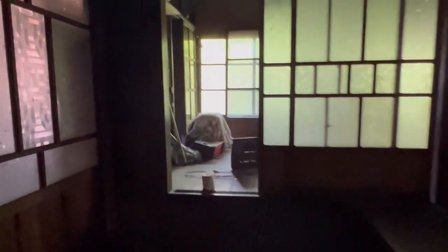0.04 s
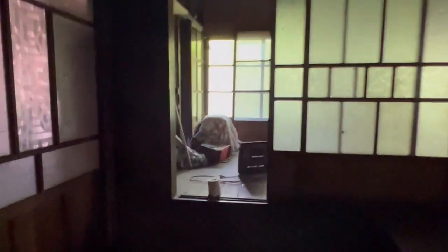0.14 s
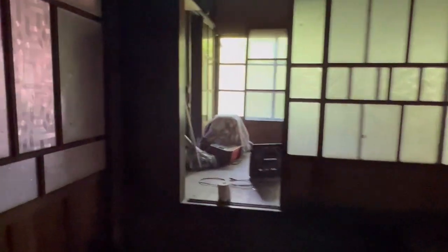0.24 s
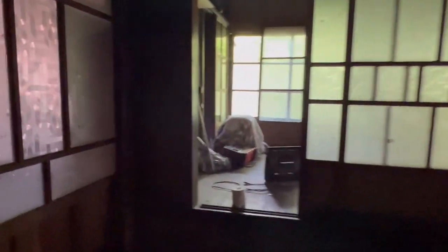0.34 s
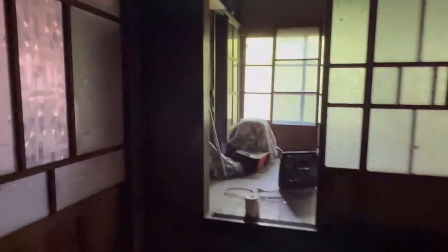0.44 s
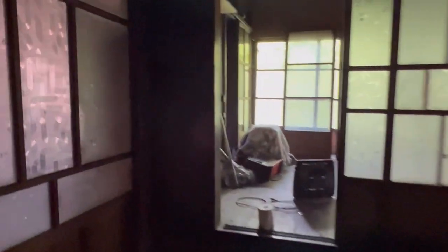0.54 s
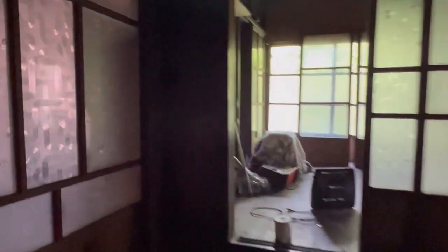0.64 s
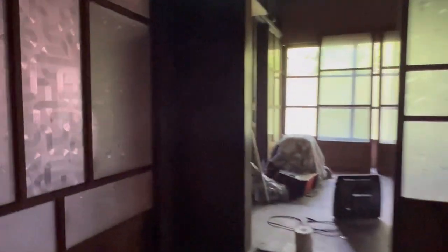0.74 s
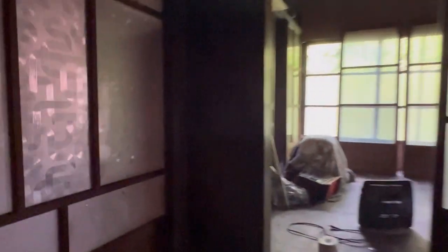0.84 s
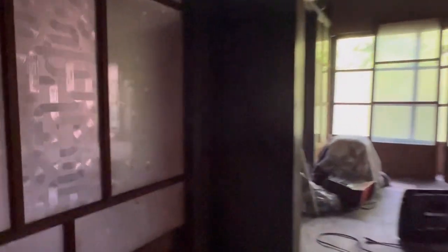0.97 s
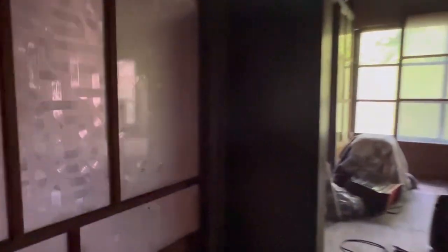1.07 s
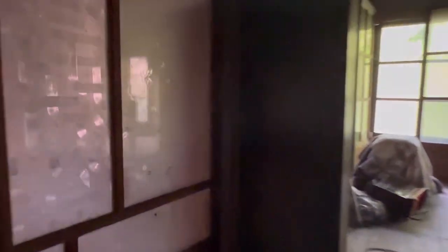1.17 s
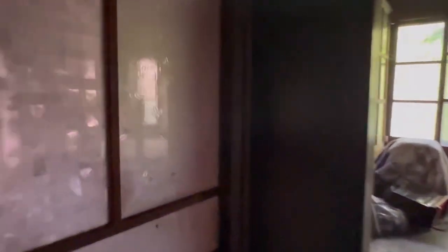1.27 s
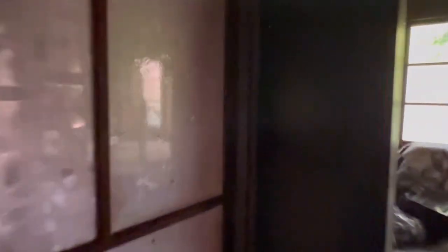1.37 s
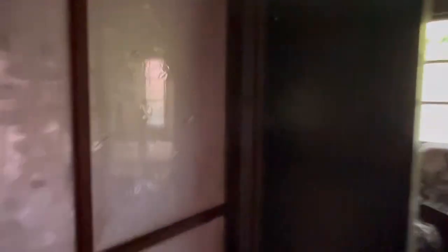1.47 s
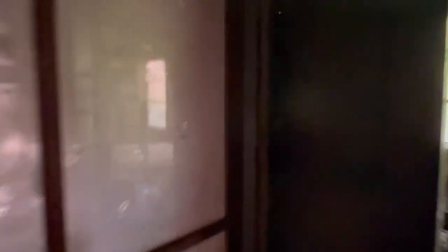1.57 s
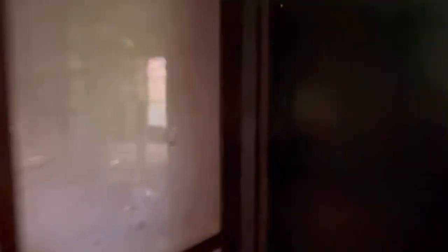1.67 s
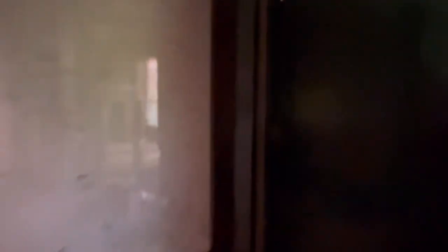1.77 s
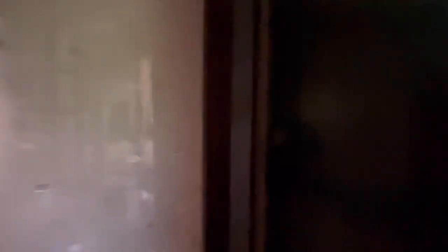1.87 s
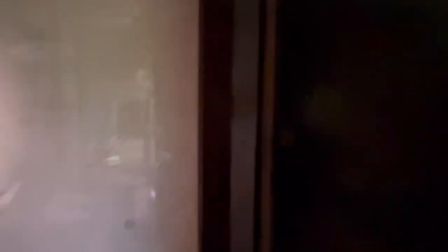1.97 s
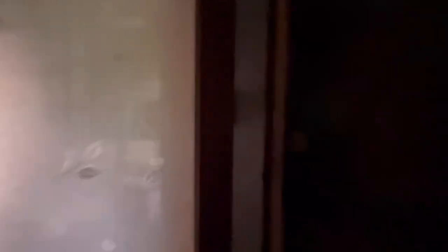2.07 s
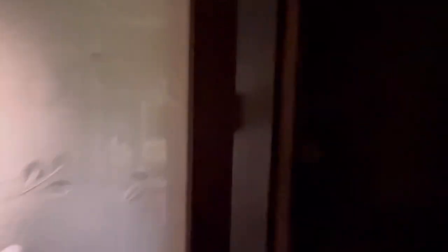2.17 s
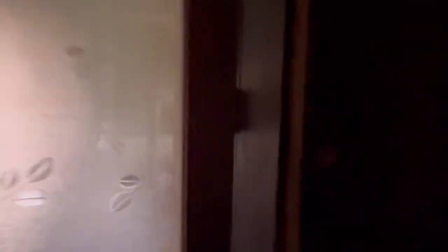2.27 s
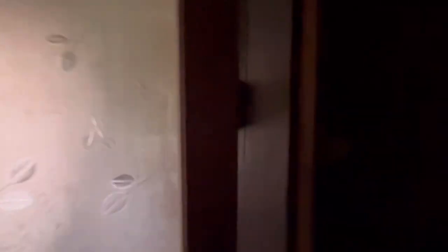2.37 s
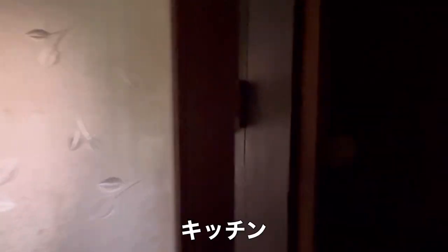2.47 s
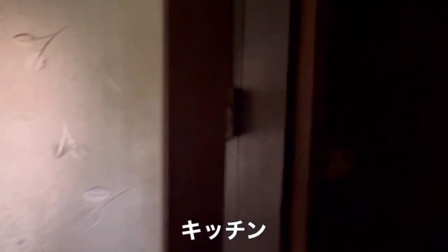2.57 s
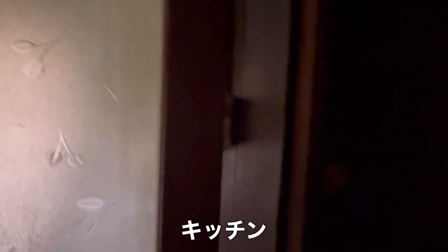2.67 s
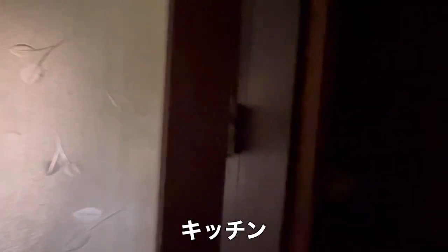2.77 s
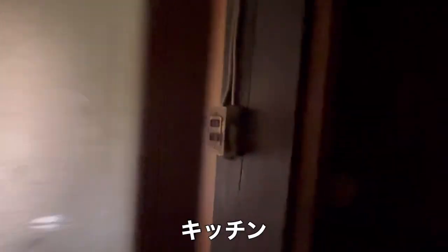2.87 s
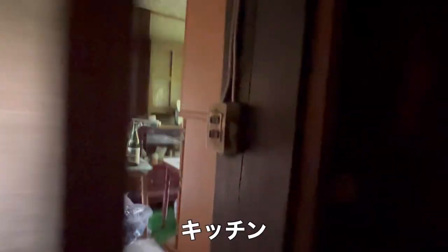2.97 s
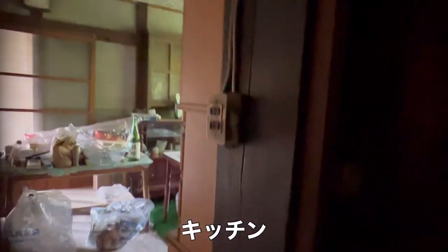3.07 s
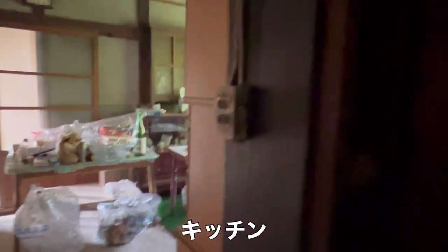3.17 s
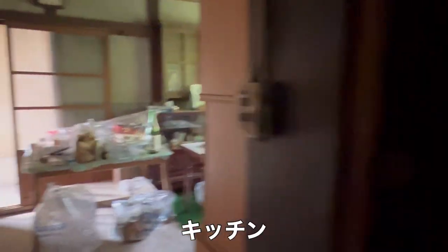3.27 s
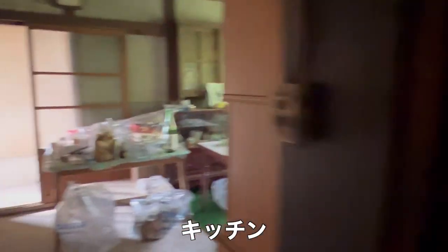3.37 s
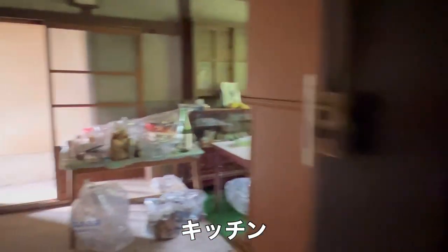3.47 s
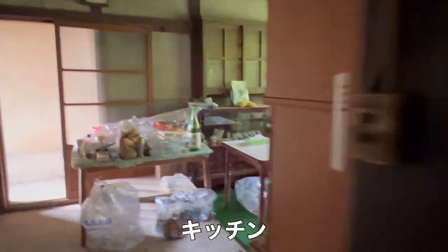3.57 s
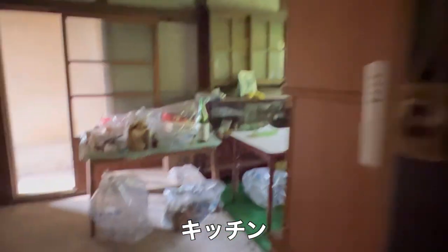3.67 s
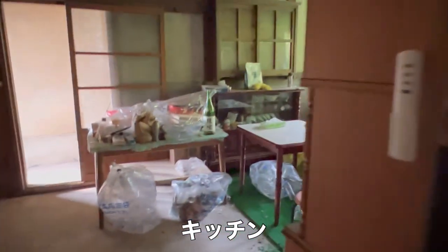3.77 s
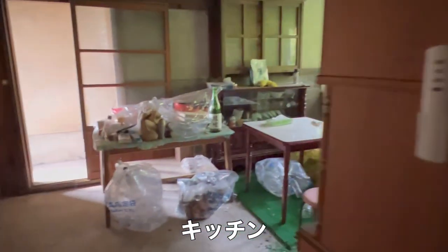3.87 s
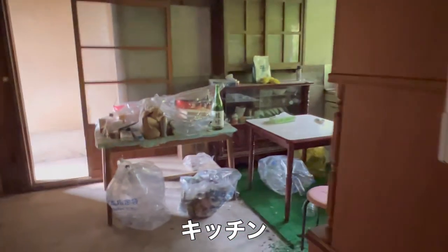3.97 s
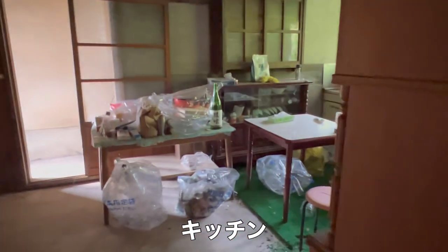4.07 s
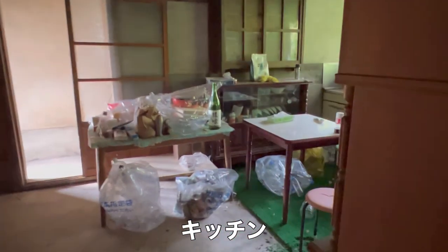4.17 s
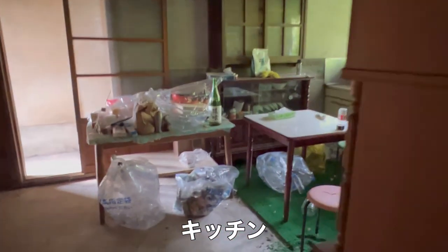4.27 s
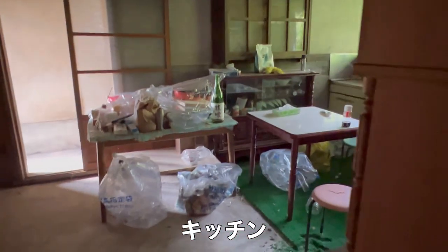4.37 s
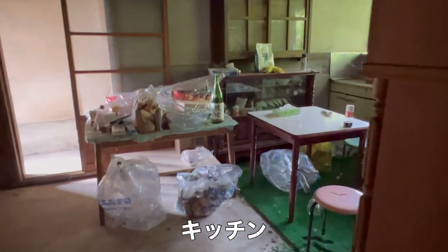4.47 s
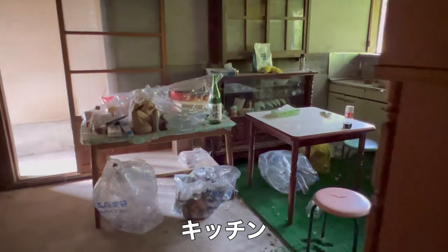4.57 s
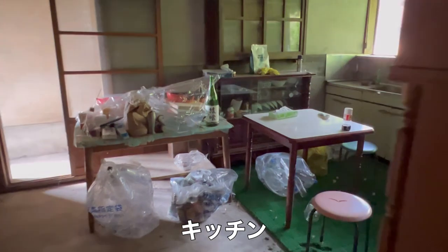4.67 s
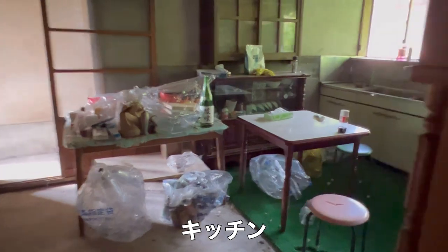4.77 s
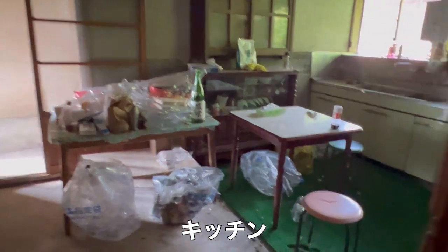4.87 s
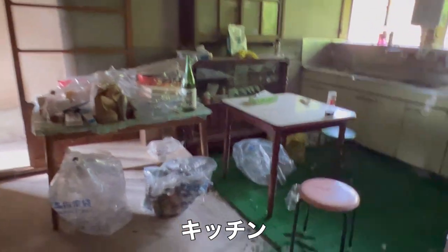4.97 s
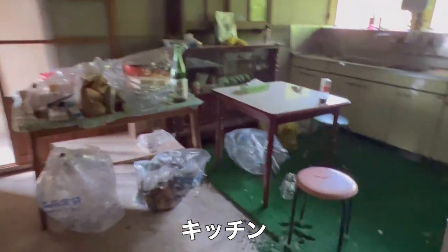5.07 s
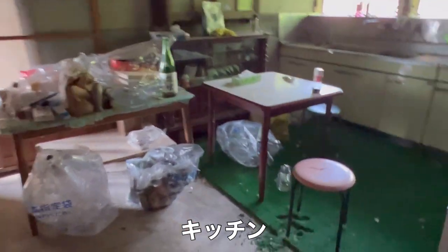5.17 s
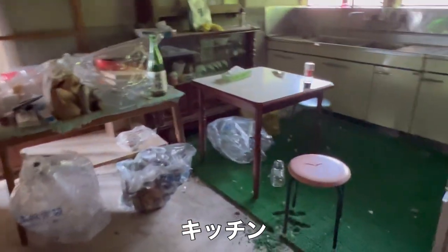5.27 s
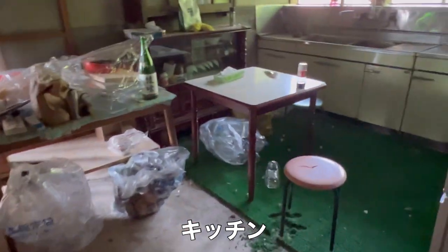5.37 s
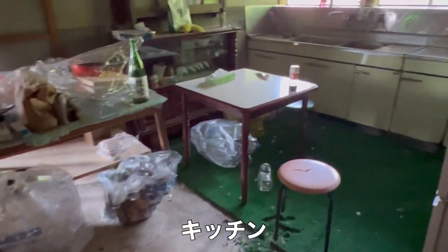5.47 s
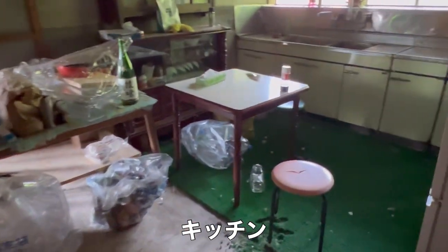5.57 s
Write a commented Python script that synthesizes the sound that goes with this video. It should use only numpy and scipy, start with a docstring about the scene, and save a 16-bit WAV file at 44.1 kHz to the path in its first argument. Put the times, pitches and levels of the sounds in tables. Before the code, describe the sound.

Close, handheld stereo pickup in a quiet wooden house. Soft, dull footsteps and rustling fabric come first, then a wooden sliding door groans, rumbles and rattles over a worn track, panes chattering. It bangs into its stop with a cluster of knocks and shudders still. A few more steps follow, one slapping a loose floorboard.

```python
"""Footfalls cross the wooden floor of a quiet house; rustling clothes and faint hiss run throughout.
A sliding door groans, rumbles, taps and chatters over its track: dense impacts and slips excite wood and panes.
It hits its stop in a cluster of blows, ringing its modes, and shudders to rest.
Steps follow; one knocks a loose board, a bank of modes struck by uneven slaps.
A small room answers with decaying noise tails. All dB are relative to each part's own scale."""
import sys
import numpy as np
from scipy import signal
from scipy.fft import rfft, irfft, next_fast_len
from scipy.io import wavfile
from scipy.ndimage import map_coordinates

SR = 44100
rng = np.random.default_rng(int(sys.argv[2]) if len(sys.argv) > 2 else 0)


def master(y):
    """Save y as 16-bit WAV."""
    cut = np.clip(np.atleast_2d(y).T, -1, 1)
    pcm = np.round(cut * 32767)  # scale
    wavfile.write(sys.argv[1], SR, pcm.astype(np.int16))


N = 248283


def amp(db):
    """Decibels to gain."""
    return 10 ** (np.asarray(db) / 20)


def unit(x):
    """Scale to rms 1."""
    return x / np.sqrt(np.mean(x ** 2) + 1e-20)


def along(points, hz):
    """(Hz, value) points interpolated on a log frequency axis."""
    f, v = np.transpose(points)
    return np.interp(np.log(hz + 1), np.log(f + 1), v)


def since(start_s):
    """Seconds gone by since start_s at every sample, 0 before."""
    return np.maximum(0, np.arange(N) / SR - start_s)


def wobble(knots_per_s):
    """Smooth random curve."""
    return map_coordinates(rng.standard_normal(4096), [np.arange(N) * knots_per_s / SR], mode="wrap")


def filtered(x, response):
    """x times a complex response of frequency."""
    n = x.shape[-1]
    m = next_fast_len(n + 8192)
    return irfft(rfft(x, m) * response(np.fft.rfftfreq(m, 1 / SR)), m)[..., :n]


def colour(x, spectrum):
    """x shaped by the spectrum, falling away below its lowest point, at rms 1."""
    lowest_hz = spectrum[0][0]
    return unit(filtered(x, lambda hz: amp(along(spectrum, hz)) * np.minimum(1, hz / lowest_hz) ** 2))


def noise(n=N):
    """Two unrelated noises: sound from the front and from the sides."""
    return rng.standard_normal((2, n))


def contacts(rate_per_s, spread_db, life_s):
    """Tiny impacts of random size and time, each a noise burst falling by 1/e in life_s."""
    hits = rng.random(N) < rate_per_s / SR
    sizes = hits * amp(spread_db * np.clip(rng.standard_normal(N), -2, 2))
    energy = signal.lfilter([1], [1, -np.exp(-2 / (life_s * SR))], sizes ** 2)
    return unit(np.sqrt(energy) * noise())


def burst(t, attack_s, t60_s):
    """Exponential rise and decay of a blow."""
    return (1 - np.exp(-t / attack_s)) * amp(-60 * t / t60_s)


def ring(modes, blow, t, scatter_db, rise_cycles, detune):
    """Decaying modes struck with the (Hz, dB) force spectrum; level, pitch and phase scatter at random."""
    hz, db, t60_s = np.transpose(modes)[:, :, None]
    scatter = scatter_db * np.clip(rng.standard_normal((2, len(modes), 1)), -1.5, 1.5)
    size = amp(db + along(blow, hz) + scatter)
    hz = hz * (1 + detune * rng.standard_normal(hz.shape))
    phase = 2 * np.pi * rng.random((2, len(modes), 1))
    tones = np.sin(2 * np.pi * hz * t + phase)
    return (size * burst(t, rise_cycles / hz, t60_s) * tones).sum(1)


def add(out, start_s, x):
    """Mix x into out at start_s."""
    i = max(0, round(start_s * SR))
    out[:, i:i + x.shape[1]] += x[:, :N - i]


# hiss spectrum: f/Hz, level/dB
HISS_SPECTRUM = [(260, -31), (450, 12.5), (530, 2.5), (579, 7), (802, 3.5), (1060, 5), (2330, 2.5),
                 (2470, 6), (10700, -9.5), (15500, -40)]
# dull background bands: f/Hz, level/dB, swing/dB
DULL_BANDS = [(50, -79, 4), (215, -78, 4), (290, -73, 5)]
# common gain of the dull bands: t/s, level/dB
DULL_LEVEL = [(0, -1), (0.421, 3.5), (.53, 8.5), (.8, 2), (1.2, -0.5), (4.7, -11), (5.3, 11)]


def still_air():
    """Faint noise hiss over dull noise bands whose levels swell and fade."""
    out = amp(-65.0 + 0.15 * wobble(0.79)) * colour(noise(), HISS_SPECTRUM)
    for hz, db, swing_db in DULL_BANDS:
        band = [(hz / 1.6, -22), (hz, 0), (hz * 1.6, -16), (hz * 10, -80)]
        level_db = db + np.interp(since(0), *np.transpose(DULL_LEVEL)) + swing_db * wobble(22)
        out += amp(level_db) * colour(noise(), band)
    return out


# fabric spectrum: f/Hz, level/dB
FABRIC_SPECTRUM = [(90, -4), (220, 2), (544, -2.5), (607, -1), (755, 1), (1380, 0.5), (1560, 0),
                   (3890, 2.5), (5110, -3), (5800, 1), (7090, 1), (10800, -1), (12200, -9), (13200, -47),
                   (15500, -24.5)]
# rustles, one per move: t/s, level/dB, t60/s
MOVES = [(-.03, -56, 0.27), (0.042, -54.5, 1.45), (.33, -63, 1), (0.587, -59, 1.4), (0.829, -56, 0.63),
         (.93, -57, 0.71), (1.08, -60.5, 2.8), (1.185, -54.5, 0.32), (1.33, -50, 11.3), (1.44, -56, 2.1),
         (1.613, -40.5, 2), (1.924, -46, 1.9), (2.03, -50.5, 2.7), (2.11, -46, 1.85), (2.416, -46.5, 1.9),
         (4.379, -57, 0.72), (4.518, -62, 1.4), (4.76, -53.5, 0.44), (5.207, -42, 0.86), (5.371, -49, 2.1),
         (5.53, -52, 1.8)]
MOVE_ATTACK_S, RUSTLE_WAVER_DB = 0.034, 1.72


def clothes():
    """Fabric rubs in countless small slips; each move swells quickly and fades."""
    power = np.zeros(N)
    for s, db, t60_s in MOVES:
        rise = np.minimum(1, since(s) / MOVE_ATTACK_S)
        power += (rise * amp(db - 60 * since(s + MOVE_ATTACK_S) / t60_s)) ** 2
    slips = colour(contacts(rate_per_s=2500, spread_db=4.0, life_s=0.0051), FABRIC_SPECTRUM)
    return np.sqrt(power) * amp(-1.5 + RUSTLE_WAVER_DB * wobble(24.876)) * slips


# small hard clicks: t/s, level/dB, f/Hz
TICKS = [(0.619, -37, 3670), (0.622, -36.5, 9600), (2.044, -35, 9000), (2.204, -28.5, 10200),
         (2.455, -50, 8500), (2.611, -32.5, 5130), (2.636, -33, 8800), (2.733, -26, 8600),
         (2.753, -20.5, 9600), (3.061, -27, 4670), (3.625, -29, 6100), (3.932, -23, 11000),
         (4.01, -25.5, 6500), (5.046, -23.5, 7100), (5.296, -30.5, 10200)]


def ticks():
    """Hard points touch: a few milliseconds of bright, broad noise."""
    out, t = np.zeros((2, N)), np.arange(SR // 20) / SR
    for s, db, pitch_hz in TICKS:
        band = [(pitch_hz / 3, -12), (pitch_hz, 0), (1.25 * pitch_hz, -5), (1.8 * pitch_hz, -26)]
        click = filtered(colour(noise(len(t)), band), lambda hz: 1 / (1 + (hz / 12000) ** 10))
        add(out, s, amp(db - 4.5) * click * burst(t, attack_s=0.00019, t60_s=0.029))
    return out


# floorboard modes: multiple of board pitch, level/dB, share of board t60
BOARD_MODES = [(.57, 3, 0.28), (1.0, 4, 0.68), (1.28, 4, 0.21), (1.9, -4, 0.73), (2.85, -18, 0.45),
               (4.4, -14, 1), (5.0, -5.5, 0.64), (6.5, -11, 0.6), (8.3, -8, 0.94), (9.3, -3, 0.4),
               (14.2, -8, 0.66)]
# spectra of shoe knock, grit and floor thud: f/Hz, level/dB
SHOE_SPECTRUM = [(150, -7), (250, 8), (420, -13), (490, -3), (583, -5), (725, 4.5), (1130, 1), (1660, -5.5),
                 (2200, -52), (2860, -48), (4840, -120)]
GRIT_SPECTRUM = [(940, -39), (1600, 7), (2480, 4.5), (2940, 7.5), (5150, 0.5), (6850, 1.5), (11900, -5),
                 (14000, -71), (15500, -23)]
THUD_SPECTRUM = [(100, 0), (200, 2), (290, -4), (450, -33), (900, -39), (2000, -110)]
GRIT_DB = -5.5  # over the knock


def footfall(thump_db, knock_db, pitch_hz, t60_s):
    """One contact pushes the floor down and rings the board under it; the shoe knocks and grit crunches."""
    t = np.arange(SR // 3) / SR
    modes = np.array(BOARD_MODES) * [pitch_hz, 1, t60_s]
    blow = [(1.5 * pitch_hz, thump_db - 5.0), (2.6 * pitch_hz, knock_db - 6.5)]
    boom = ring(modes, blow, t, scatter_db=2, rise_cycles=.8, detune=.02)
    # walker's weight: one heavily damped swing; a stiff, high board yields less
    give = min(1, 170 / pitch_hz) ** 4
    swing = np.sin(np.pi * pitch_hz * t)
    push = give * amp(thump_db - 3) * swing * burst(t, attack_s=0.0047, t60_s=0.041)
    knock = amp(knock_db - 1) * colour(noise(len(t)), SHOE_SPECTRUM) * burst(t, attack_s=0.0012, t60_s=0.08)
    grit = colour(noise(len(t)), GRIT_SPECTRUM) * burst(t, attack_s=0.00013, t60_s=0.14)
    grit *= amp(knock_db + GRIT_DB)
    thud = colour(noise(len(t)), THUD_SPECTRUM) * burst(t, attack_s=0.0024, t60_s=0.082)
    thud *= np.sqrt(give) * amp(thump_db - 5.0)
    return push + thud + boom + knock + grit


# footfalls: t/s, level/dB, contact hardness/dB, board f/Hz, board t60/s, sole over heel/dB
STEPS = [(0.038, -39.5, -17, 197, 0.064, -23), (.613, -35, -8, 327, 0.12, -7),
         (.647, -42.5, -14, 322, 0.13, -8), (0.711, -50, -13, 175, 0.047, -7),
         (1.098, -56.5, -2.5, 220, 0.13, -2), (1.318, -32.5, -19.5, 204, 0.047, -19),
         (1.324, -34.5, -22, 125, .07, -9), (1.619, -58.5, 4, 199, 0.054, -1),
         (1.673, -47, -22.5, 198, 0.066, -12), (1.94, -34.5, -15, 213, 0.093, 4),
         (1.965, -34, -23, 149, 0.13, -10.5), (2.008, -41, -33, 186, 0.14, -5),
         (2.481, -45.5, -18, 140, 0.1, 6), (4.365, -41, -7.5, 162, 0.2, -2),
         (4.767, -40, -6.5, 257, 0.12, 5.5), (4.806, -40.5, -4.5, 241, 0.086, -3),
         (4.834, -32.5, -11.5, 183, 0.11, -11), (5.02, -32.5, -4.5, 192.4, 0.16, 6.5),
         (5.036, -33.5, 2, 303, 0.057, -8), (5.052, -30.5, -3.5, 175, 0.22, -1.5)]
ROLL_S = .014  # heel to sole


def steps():
    """Each foot lands on its heel and rolls onto its sole: two contacts."""
    out = np.zeros((2, N))
    for s, weight_db, hard_db, pitch_hz, t60_s, sole_db in STEPS:
        for delay_s, db in ((0, weight_db), (ROLL_S, weight_db + sole_db)):
            add(out, s + delay_s, footfall(db, db + hard_db, pitch_hz, t60_s))
    return out


# loose board modes: f/Hz, level/dB, t60/s
LOOSE_BOARD_MODES = [(152, 3, .2), (320, 0, .09), (479, -7, .12), (732, -3, .12), (840, -4, .12),
                     (1010, 2, .1), (1130, 0, .1), (1389, -1, .11), (1970, -7, .09), (2380, -4, .09),
                     (2540, -3, .1)]
# slaps on the joist: t/s, level/dB, brightness/dB
BOARD_SLAPS = [(5.038, -38, 1), (5.044, -38, 0.5), (5.056, -41, -11), (5.071, -41, -8), (5.098, -42.5, -1),
               (5.128, -48, -9), (5.194, -50, -13)]
# wood knock spectrum, also of the door: f/Hz, level/dB
KNOCK_SPECTRUM = [(150, -1), (400, 8), (550, -11), (730, 6.5), (1100, -3), (1500, -14.5), (2400, -7.5),
                  (4000, -33), (8000, -56)]


def loose_board():
    """The trodden board slaps its joist with a crack and chatters unevenly to rest."""
    out, t = np.zeros((2, N)), np.arange(SR // 3) / SR
    for s, db, bright_db in BOARD_SLAPS:
        blow = [(700, db), (2500, db + bright_db)]
        modes = ring(LOOSE_BOARD_MODES, blow, t, scatter_db=2, rise_cycles=.6, detune=.03)
        crack = amp(db + 1) * colour(noise(len(t)), KNOCK_SPECTRUM) * burst(t, attack_s=.0003, t60_s=.04)
        add(out, s, modes + crack)
    return out


# groans of the binding door: t/s, length/s, f/Hz, level/dB
RUBS = [(2.472, 0.14, 140, -47.5), (2.578, 0.071, 192.5, -39.5), (2.755, .1, 184.5, -29),
        (2.73, 0.16, 533, -41.5), (3.195, 0.18, 970, -34.5), (3.377, 0.2, 443, -37),
        (3.385, .08, 1146, -43), (3.597, 0.24, 362, -42.5)]
SLIPS_PER_S, RUB_WIDTH_SHARE = 300, .3  # width over pitch
RUB_WAVER_SHARE, RUB_WAVER_KNOTS_PER_S = .06, 70


def rubs():
    """Wood binds on wood: slips keep one resonance sounding, its pitch wavering with the pressure."""
    out = np.zeros((2, N))
    for s, length_s, pitch_hz, db in RUBS:
        n = int(length_s * SR)
        slips = (rng.random(n) < SLIPS_PER_S / SR) * noise(n)
        half_width_hz = RUB_WIDTH_SHARE * pitch_hz / 2
        voice = filtered(slips, lambda hz: 1 / (1 + 1j * (hz - pitch_hz) / half_width_hz) ** 2)
        drift_hz = RUB_WAVER_SHARE * pitch_hz * wobble(RUB_WAVER_KNOTS_PER_S)[:n]
        turn = np.exp(2j * np.pi * np.cumsum(drift_hz) / SR)
        voice = np.real(signal.hilbert(voice) * turn)
        add(out, s, amp(db) * unit(voice * signal.windows.tukey(n, .5)))
    return out


# door modes, ringing freely: f/Hz, level/dB, t60/s
DOOR_MODES = [(76, -2, .15), (120, 0, .13), (178, -.5, .19), (226, -3, .1), (323, 0, .16), (371, -3, .16),
              (398, 1, .12), (522, -6, .08), (610, -6, .07), (728, 2.5, .16), (790, -8, .1), (941, -4, .13),
              (1003, -5, .12), (1067, 2, .14), (1135, -3, .09), (1227, -6, .12), (1410, -4, .08),
              (1670, -5, .07), (1950, -5, .07), (2428, -3, .1), (2711, -2, .1), (3161, -4, .12),
              (3340, -4, .12)]
# door travel from rest to stop: t/s, speed/0-1
SPEED = [(2.57, 0.25), (2.78, 0.33), (2.92, 0.49), (3.26, 0.77), (3.5, 0.88), (3.87, 0.46)]
START_S, STOP_S = SPEED[0][0], SPEED[-1][0]
# force spectrum of a joint tap: f/Hz, level/dB
RATTLE_BLOW = [(180, -5), (450, -2), (1200, -3.5), (3300, -17)]
RATTLE_GAP_S, RATTLE_RING_SHARE, RATTLE_DB = .017, .35, -31.5  # mean gap; share of t60; at full speed
RATTLE_DELAY_S, RATTLE_FADE_DB_PER_S = .14, 4
MOVING_DETUNE = 0.0546  # pitch spread on the move


def rattles():
    """Loose joints tap at uneven moments while the door runs, each tap with its own mix of short rings."""
    out, t = np.zeros((2, N)), np.arange(SR // 20) / SR
    modes = np.array(DOOR_MODES) * [1, 1, RATTLE_RING_SHARE]
    for s in np.arange(START_S + RATTLE_DELAY_S, STOP_S, RATTLE_GAP_S):
        s += RATTLE_GAP_S * rng.uniform(-0.45, .5)
        level_db = RATTLE_DB - RATTLE_FADE_DB_PER_S * (s - START_S) + rng.uniform(-5.0, 1.9)
        force = np.interp(s, *np.transpose(SPEED)) * amp(level_db)
        tap = ring(modes, RATTLE_BLOW, t, scatter_db=6, rise_cycles=.3, detune=MOVING_DETUNE)
        add(out, s, force * tap)
    return out


def woody(x, ring_db):
    """x plus the ringing that it raises in the door's modes, a sum of resonators."""
    mode_hz, _, t60_s = np.transpose(DOOR_MODES)
    widths_hz = np.log(1000) / (np.pi * t60_s)

    def peaks(f):
        return sum(1j * f * w / (c * c - f * f + 1j * f * w) for c, w in zip(mode_hz, widths_hz))

    return filtered(x, lambda f: 1 + amp(ring_db) * peaks(f))


# spectra of the door's frame, panel and panes: f/Hz, level/dB
FRAME_SPECTRUM = [(22, -49), (38, -4), (81, -3.5), (146, 0), (172, -1.5), (243, -10), (280, -6.5),
                  (360, -46), (620, -120)]
PANEL_SPECTRUM = [(130, 11), (220, 10), (249, 10.5), (409, 7.5), (569, 5.5), (722, -2), (843, -2),
                  (925, -1), (1090, -12), (1550, -11), (2600, -17.5), (3380, -71), (5720, -120)]
PANES_SPECTRUM = [(1060, 5.5), (1800, 1), (3260, 0), (3800, -3.5), (4720, -4), (5070, -9), (6300, -4.5),
                  (7820, -13), (10900, -15.5), (12700, -43), (15500, -55)]
# running; rows frame, panel, panes: level at full speed/dB, exponent of speed, fade from the start/(dB/s)
RUNNING = [(-25, 0.51, 13.5), (-29, 1.02, 0.5), (-35.5, 0.43, 2.5)]
# shudder at the stop; rows frame, panel, panes: level/dB, decay/(dB/s)
SHUDDERING = [(-40, 48), (-37, 76), (-41, 98)]
SHUDDER_HOLD_S, HANDOVER_S = 0.23, 0.043
# runners bite while the hand pushes, then coast: shares 0-1 of scrape in the panel's sound
PUSH_ENDS_S, EASE_S, BITE_SHARE, COAST_SHARE, SHUDDER_SHARE = 3.43, 0.036, 0.72, 0.14, 0.33


def sliding():
    """Runners jolt over a worn track: the frame rumbles, the panel drums and scrapes, loose panes chatter."""
    frame_hits = contacts(rate_per_s=260, spread_db=3.5, life_s=0.0057)
    panel_hits = contacts(rate_per_s=300, spread_db=4, life_s=0.006)
    pane_hits = contacts(rate_per_s=380, spread_db=1.5, life_s=0.014)
    rumble = colour(woody(frame_hits, ring_db=-4.5), FRAME_SPECTRUM)
    panel = colour(woody(panel_hits, ring_db=-4), PANEL_SPECTRUM)
    panes = colour(woody(pane_hits, ring_db=-1.5), PANES_SPECTRUM)
    t = np.arange(N) / SR
    speed = np.interp(t, *np.transpose(SPEED))
    started, stopped = (1 - np.exp(-since(s) / HANDOVER_S) for s in (START_S, STOP_S))
    # dry contact excites the panel's upper modes, smooth running its lower ones
    drum = filtered(panel, lambda hz: 1 / (1 + (hz / 720) ** 6))
    pushing = .5 - .5 * np.tanh((t - PUSH_ENDS_S) / EASE_S)
    scrape = pushing * BITE_SHARE * speed + (1 - pushing) * COAST_SHARE
    scrape = np.clip(scrape + stopped * (SHUDDER_SHARE - scrape), 0, 1)
    panel = np.sqrt(1 - scrape) * unit(drum) + np.sqrt(scrape) * unit(panel - drum)
    out = np.zeros((2, N))
    parts = zip((rumble, panel, panes), RUNNING, SHUDDERING)
    for part, (run_db, power, fade_db_per_s), (shudder_db, decay_db_per_s) in parts:
        run = speed ** power * amp(run_db - fade_db_per_s * since(START_S))
        shudder = amp(shudder_db - decay_db_per_s * since(STOP_S + SHUDDER_HOLD_S))
        out += part * ((started - stopped) * run + stopped * shudder)
    return out


# runners drop into worn spots: t/s, frame thump level/dB, panel body/dB, knock/dB, pane clack/dB
JOLTS = [(2.576, -33, -44, -47, -68), (2.637, -28, -37, -55, -35.5), (2.678, -28, -36, -49, -35.5),
         (2.724, -27, -38, -53, -31), (2.768, -27, -45, -41, -28.5), (2.784, -30, -45, -39, -31),
         (2.81, -23, -51, -37, -28.5), (2.838, -27, -51, -36.5, -37), (2.907, -22, -50, -38.5, -44),
         (2.966, -21, -41, -37.5, -37), (3.025, -18, -23.5, -25, -36.5), (3.048, -17.5, -38, -39, -30.5),
         (3.165, -21.5, -44, -46, -51), (3.184, -26, -26.5, -28.5, -32), (3.266, -38, -30, -34, -59),
         (3.392, -40, -25, -33, -33), (3.455, -28, -28, -43, -39.5), (3.559, -20, -23, -27.5, -38)]
# door hits its stop, rocks and falls back: t/s, frame thump level/dB, panel body/dB, knock/dB, pane clack/dB
SLAMS = [(3.884, -26, -28.5, -33, -42), (3.892, -16.5, -19, -29, -31.5), (3.9, -24, -28.5, -31, -47),
         (3.916, -23.5, -24, -29, -47), (3.929, -21, -27, -27, -36.5), (3.943, -36.5, -39, -25, -41),
         (4.018, -30, -32, -34, -40), (4.04, -18.5, -50, -54, -37.5), (4.062, -29, -38, -42, -38),
         (4.084, -35, -29.5, -26.5, -35), (4.1, -38, -32.5, -29.5, -39.5), (4.159, -40, -43, -39, -49),
         (4.218, -46, -47, -49, -47)]
JOLT_RING_SHARE, STOP_RING_SHARE = 0.54, .8  # shares of t60
STOP_DETUNE, STOP_DIP_DB = .016, -10  # the edge blow barely wakes the panel's middle modes
# lower edge of the thumps at the start, and its rise: the deepest bass falls away
BASS_EDGE_HZ, EDGE_HZ_PER_S = 19, 41


def bumps():
    """Jolts in the track and the blows at the stop ring the door and shake its panes."""
    out, t = np.zeros((2, N)), np.arange(SR // 3) / SR
    for s, thump_db, body_db, knock_db, clack_db in JOLTS + SLAMS:
        # on the move the groove damps the modes and shifts them from spot to spot; at the stop they ring freer
        if s < STOP_S:
            share, detune, dip_db = JOLT_RING_SHARE, MOVING_DETUNE, 0
        else:
            share, detune, dip_db = STOP_RING_SHARE, STOP_DETUNE, STOP_DIP_DB
        blow = [(190, thump_db), (320, body_db), (420, body_db), (520, body_db + dip_db),
                (610, knock_db + dip_db), (720, knock_db), (1100, knock_db), (1450, knock_db - 6.5),
                (2500, clack_db - 6.0)]
        door = np.array(DOOR_MODES) * [1, 1, share]
        modes = ring(door, blow, t, scatter_db=1.5, rise_cycles=.7, detune=detune)
        edge_hz = BASS_EDGE_HZ + EDGE_HZ_PER_S * (s - START_S)
        thump = colour(noise(len(t)), FRAME_SPECTRUM) * burst(t, attack_s=0.0023, t60_s=0.077)
        thump *= amp(thump_db - 6.5)
        thump = signal.sosfilt(signal.butter(2, edge_hz, "highpass", fs=SR, output="sos"), thump)
        knock = colour(noise(len(t)), KNOCK_SPECTRUM) * burst(t, attack_s=0.00023, t60_s=0.035)
        clack = colour(noise(len(t)), PANES_SPECTRUM) * burst(t, attack_s=0.00023, t60_s=0.27)
        add(out, s, thump + modes + amp(knock_db + 3) * knock + amp(clack_db + 2.5) * clack)
    return out


# room decay: f/Hz, t60/s
ROOM_T60 = [(80, 0.7), (400, 0.65), (1000, 0.48), (2500, 0.8), (10000, 0.77)]


def room(x):
    """Walls answer after a few ms; crossfaded random tails change the echoes as the listener moves along."""
    out, hop = np.zeros((2, N)), SR // 5
    for start in range(0, N, hop):
        hz, t, z = signal.stft(noise(SR), SR, nperseg=256)
        decay = amp(-60 * t / along(ROOM_T60, hz)[:, None])
        tail = signal.istft(z * decay, SR, nperseg=256)[1]
        tail = np.pad(tail / np.linalg.norm(tail[0]), ((0, 0), (SR // 150, 0)))
        i = np.arange(max(0, start - hop), min(N, start + hop))
        window = np.cos(np.pi / 2 * (i - start) / hop)
        add(out, i[0] / SR, signal.fftconvolve(x[:, i] * window, tail, axes=1))
    return out


# share of the side signal copied from the front: f/Hz, share/0-1
LIKENESS = [(50, .1), (90, .3), (160, .72), (330, .74), (560, .42), (780, .42), (1000, .14), (1650, .15),
            (2900, .76), (4600, .66), (5500, .2), (6400, .15), (8000, .68), (11000, .87), (13000, .2)]
# phase of that copy against the front: f/Hz, phase/rad
LEAD = [(60, 2), (130, .85), (420, 0.54), (600, -0.7), (760, -0.9), (900, -2.5), (1100, 1.5), (1450, -2.5),
        (2000, -1.17), (4000, -1.37), (12000, -1.55)]
# side over mid: f/Hz, level/dB
WIDTH = [(85, -1.5), (220, 0), (380, 6), (650, 10.5), (1100, 4), (1450, 4), (1950, -1.5), (2800, 3),
         (4400, -3), (5000, 5.5), (5800, -13), (8000, -6.5), (11000, 2), (12000, 9.5), (13000, 19),
         (15500, 32)]


def stereo(pair):
    """Mid-side widening: the side signal is partly a phase-turned copy of the front."""
    front, around = pair

    def share(hz):
        return np.clip(along(LIKENESS, hz), 0, 1)

    turned = filtered(front, lambda hz: share(hz) * np.exp(1j * along(LEAD, hz)))
    diffuse = filtered(around, lambda hz: np.sqrt(1 - share(hz) ** 2))
    side = filtered(turned + diffuse, lambda hz: amp(along(WIDTH, hz)))
    return np.array([front + side, front - side])


def scene():
    """Door, feet and clothes in the small room."""
    slide = sliding() + rubs() + rattles()
    blows = bumps() + ticks()
    feet = steps() + loose_board()
    echo = room(amp(-7.0) * slide + amp(-12) * blows + amp(-7.0) * feet)
    return stereo(slide + blows + feet + echo + clothes() + still_air())


LOW_CUT_HZ, TOP_HZ = 30, 15850


def record(dry):
    """Cut the deepest bass and everything above the band limit."""
    dry = signal.sosfilt(signal.butter(4, LOW_CUT_HZ, "highpass", fs=SR, output="sos"), dry)
    return filtered(dry, lambda hz: hz < TOP_HZ)


dry = scene()
out = record(dry)
master(out)
```